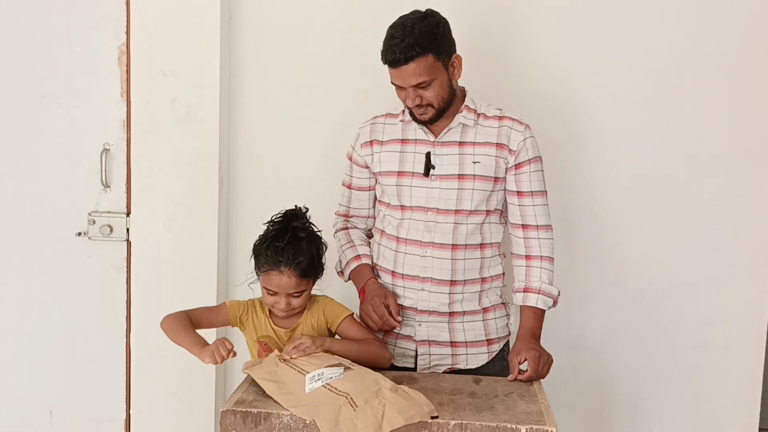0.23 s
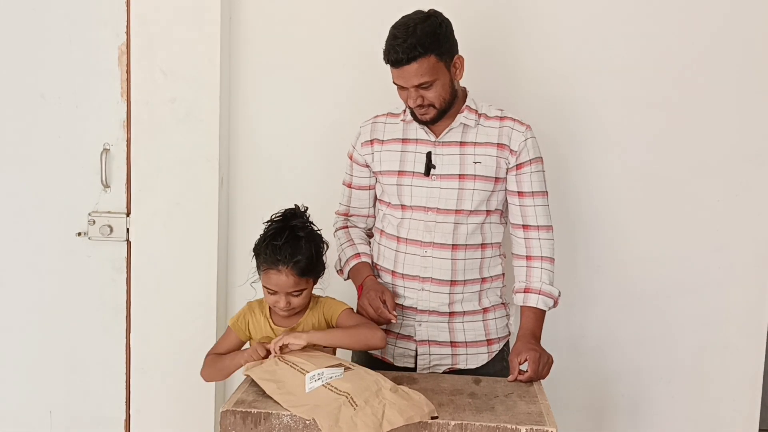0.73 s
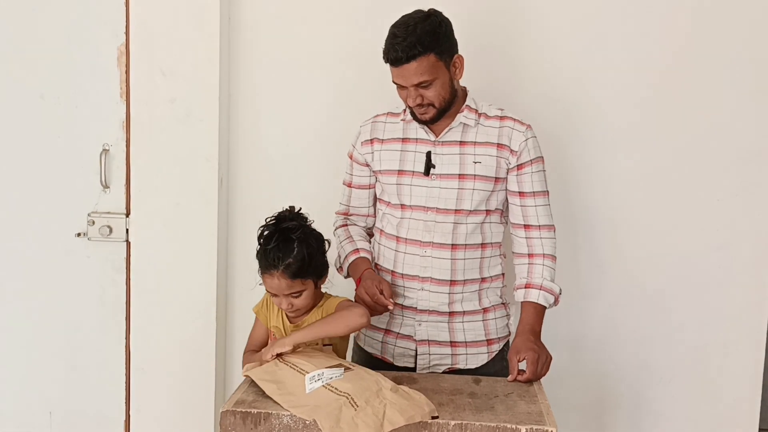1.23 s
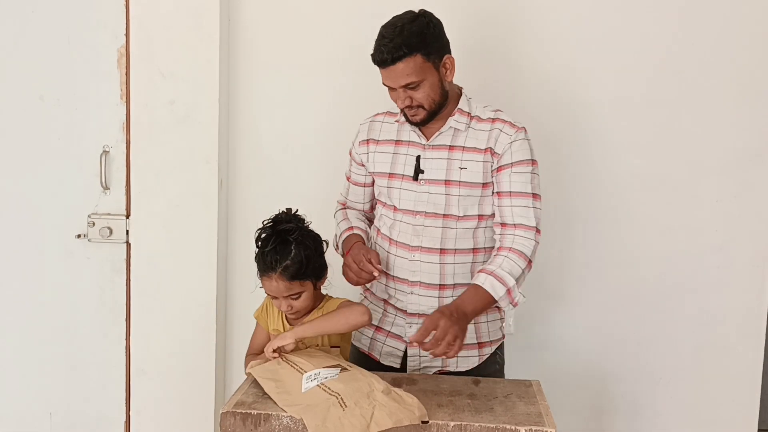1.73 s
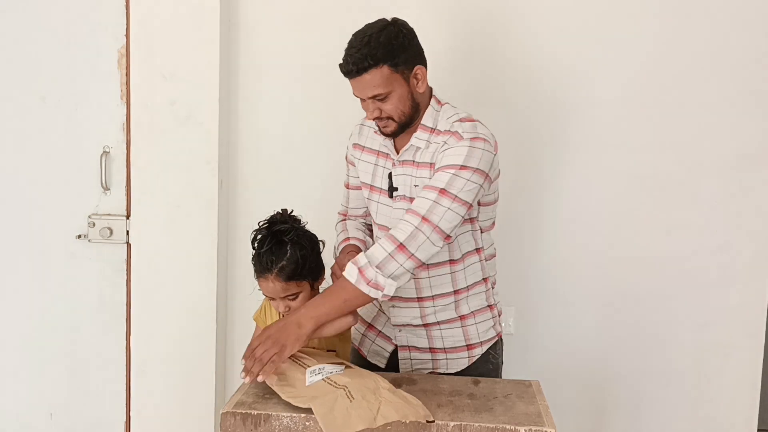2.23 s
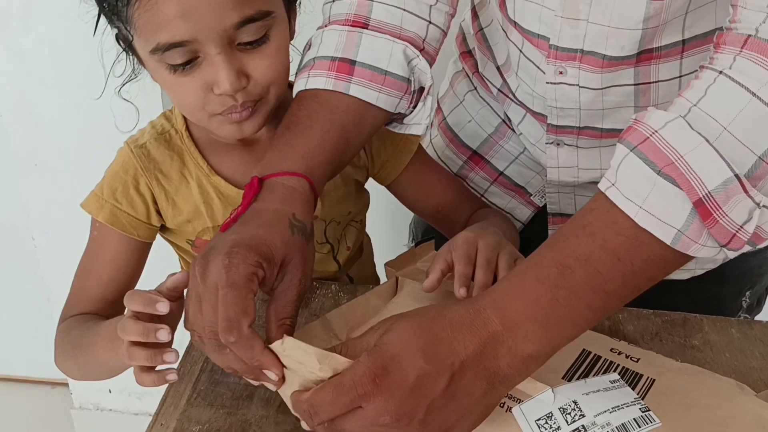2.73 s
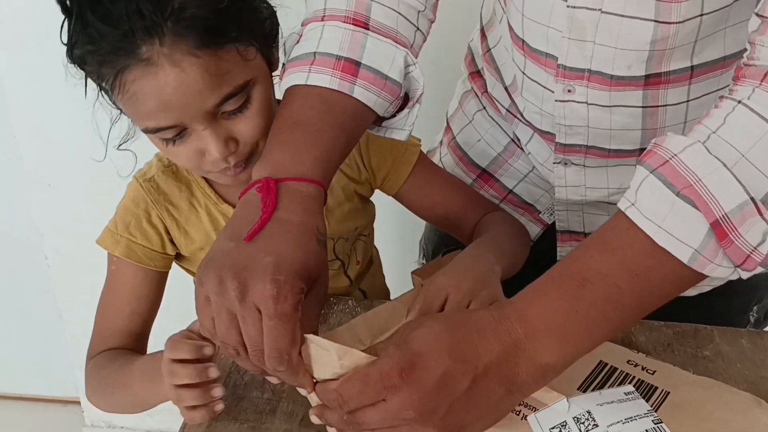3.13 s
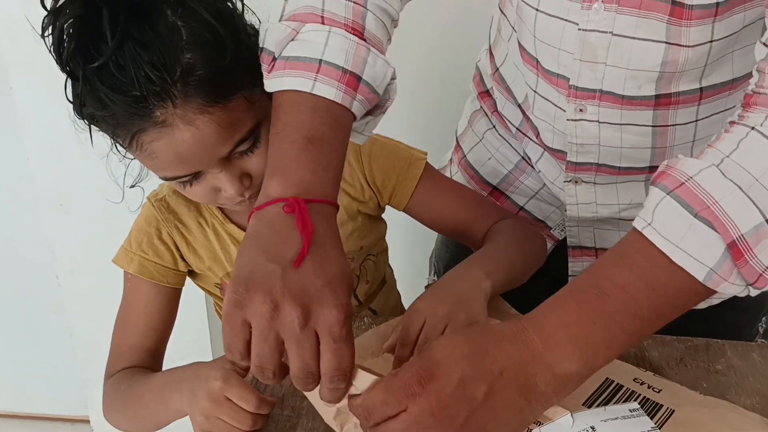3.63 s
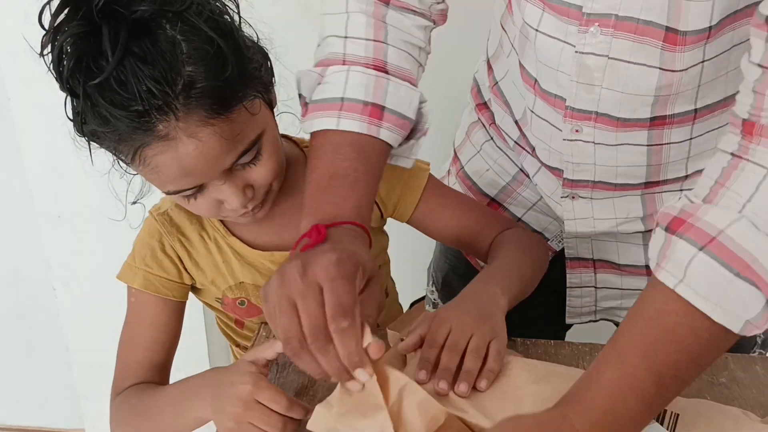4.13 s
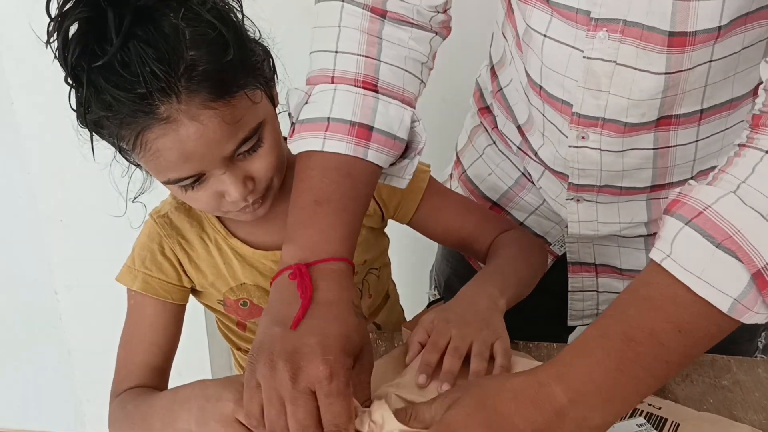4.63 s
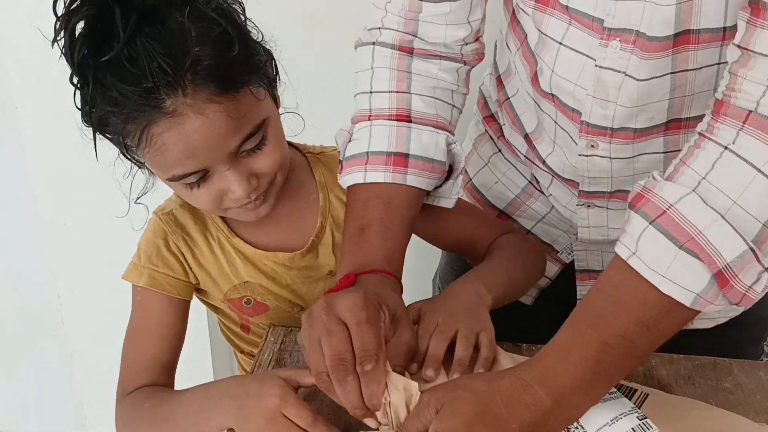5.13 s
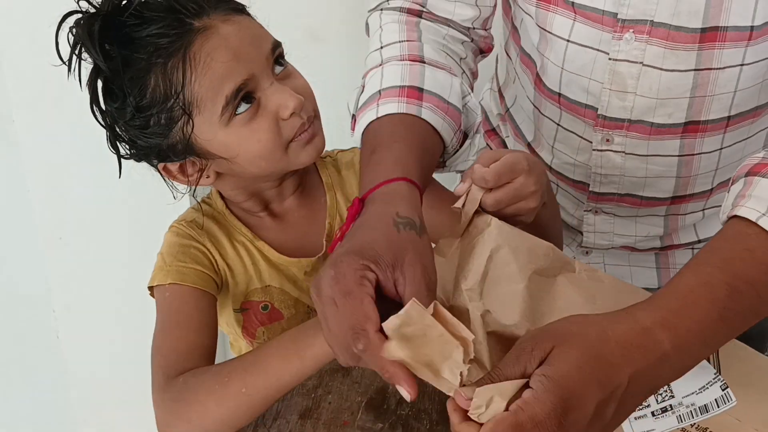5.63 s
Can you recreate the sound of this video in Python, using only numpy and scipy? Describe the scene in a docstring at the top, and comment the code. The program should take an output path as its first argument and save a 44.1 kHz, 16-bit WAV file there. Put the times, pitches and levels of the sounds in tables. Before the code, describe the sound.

Hands work a stiff paper mailer on a wooden table in a bare, slightly echoing room. Scattered crackles and small rips come first, with quiet gaps and a soft cloth brush near two seconds. After a very brief cut the crinkling is closer and denser, loudest between four and five seconds, then suddenly faint, with a few crisp creases at the end. A chest-worn microphone adds low rumble.

```python
"""A bare, hard-walled room with a wooden table, where hands crumple and tear a stiff paper envelope.
Creases snap as decaying panel tones with noisy cracks; crackle and rips are random slips through resonances.
The table top rings as damped modes, and sparse decaying reflections make the room.
A chest microphone adds body rumble, a brush of cloth and faint air, all of them coloured noise.
The sound falls silent twice for about 10 ms, cutting off the tails."""
import sys
import numpy as np
from scipy import signal
from scipy.io import wavfile
from scipy.ndimage import uniform_filter1d, minimum_filter1d

SR = 44100
rng = np.random.default_rng(int(sys.argv[2]) if len(sys.argv) > 2 else 0)


def natural_amplitude(level_db):
    """Convert a level in decibels to a linear amplitude factor, elementwise."""
    exponent = np.asarray(level_db, float) / 20
    return 10 ** exponent


def store_pcm(level_fs):
    """Save levels as 16-bit WAV."""
    pcm = np.round(np.clip(level_fs, -1, 1) * 32767).astype(np.int16)
    wavfile.write(sys.argv[1], SR, np.atleast_2d(pcm).T)


N = 259749

# All levels are relative, before the later mixing and filter gains.
# Passages of sound between the silences: (start [s], end [s])
PASSAGES = [(0, 2.587), (2.599, 5.24), (5.25, 5.89)]

# Air noise spectrum: (frequency [Hz], level [dB])
AIR_SPECTRUM = [(35, -18.5), (60, 6.5), (138, 19), (204, 6), (780, 4.5), (960, -26), (1050, 0.5),
                (9230, -12.5), (15000, -27)]
AIR_DB = -61

# Body rumble spectrum: (frequency [Hz], level [dB])
RUMBLE_SPECTRUM = [(12, -35), (25, -9), (42, -5), (53, 0), (65, -6), (85, -15), (120, -24), (200, -34),
                   (400, -90)]
# Body and cloth move the microphone: (start [s], length [s], level [dB])
SWAYS = [(0.004, 0.1, -53), (0.113, 0.033, -51), (0.196, 0.25, -48), (0.539, 0.063, -56),
         (1.478, 0.042, -52), (1.538, 0.27, -44), (1.831, 0.1, -45), (2.023, 0.25, -27),
         (2.365, 0.034, -60), (2.516, 0.11, -50), (2.603, 0.1, -44), (2.806, 0.11, -61), (2.959, 0.08, -57),
         (3.052, 0.034, -57), (3.129, 0.21, -49), (3.358, 0.093, -51), (3.52, 0.046, -53),
         (3.724, 0.05, -55.5), (3.785, 0.072, -52), (3.939, 0.061, -54), (4.069, 0.045, -55),
         (4.17, 0.46, -47), (4.635, 0.14, -51), (4.845, 0.075, -63), (4.945, 0.29, -47), (5.792, 0.14, -38)]
RESTING_DB, SWAY_EDGE_S = -63, .045

# How the hands work the paper, one list a passage:
# (time [s], force level [dB], panel frequency [Hz], tearing against crumpling [dB])
HAND_FORCE = [
    [(0.0, -33.5, 1037, 6), (0.22, -45, 1543, 4), (0.23, -12, 1604, 1), (0.31, -18, 838, 4),
     (0.54, -57, 898, 2.5), (0.72, -39.5, 1740, 4.5), (0.83, -74, 1150, -4), (0.96, -77, 833, -11),
     (1.05, -60, 2010, 13), (1.12, -39, 966, 3), (1.24, -43, 1955, -4), (1.33, -53.5, 1460, -3),
     (1.56, -17, 1686, 2.5), (1.77, -36, 1776, -0.5), (1.91, -72, 1180, 0.5), (2.05, -28.5, 1820, -13.5),
     (2.28, -36.5, 918, -2), (2.3, -14, 1050, -5.5), (2.47, -32, 960, -10.5), (2.56, -46, 1610, -3),
     (2.57, -31.5, 1637, 2), (2.59, -33, 1560, -21)],
    [(2.6, -56, 1860, 17.5), (2.69, -35.5, 615, 7.5), (2.77, -31, 617, 0), (2.82, -47, 1650, 19),
     (2.88, -39.5, 1510, 5), (2.97, -44, 1422, -2), (2.98, -15.5, 1610, 2), (3.03, -30.5, 1350, 1),
     (3.08, -18, 1110, 2), (3.15, -15.5, 1740, -4.5), (3.38, -66.5, 1260, 4.5), (3.41, -33, 1580, 9),
     (3.47, -38.5, 1690, -4.5), (3.53, -29.5, 1100, 2), (3.62, -20.5, 1350, -2), (3.82, -46, 1670, -5),
     (3.9, -28, 1390, 0.5), (3.98, -23, 1490, -12), (4.0, -4, 1610, -7.5), (4.09, -20.5, 1170, -2.5),
     (4.19, -3.5, 1560, -7.5), (4.26, -14.5, 1295, -0.5), (4.42, -15, 1536, -2), (4.58, -33, 1735, 0.5),
     (4.78, -10.5, 1432, -1), (4.83, -18, 1570, -3), (5.11, -12, 1245, -4), (5.24, -20.5, 1375, -8.5)],
    [(5.25, -50.5, 1057, 4), (5.368, -42, 1823, -4.5), (5.464, -54, 1890, 0), (5.512, -60, 820, 2),
     (5.536, -49, 1010, -4), (5.688, -45, 1680, -4), (5.756, -35, 840, -11), (5.774, -37, 834, -1),
     (5.838, -24, 945, -23), (5.89, -22.5, 1100, -4.5)],
]
# Small creases, one value a passage: (frequency [Hz])
CREASE_HZ = [3550, 4300, 3900]
# Fibre hiss spectrum: (frequency [Hz], level [dB])
HISS_SPECTRUM = [(3000, -47), (5500, -5.5), (7000, 5), (8300, -7), (9500, -4), (12000, -22), (15500, -39)]
HISS_PER_DB = 1.6  # fibre hiss grows faster with tearing than creases do

# Table-top modes: (frequency [Hz], level [dB], t60 before the hands damp it [s])
TABLE_MODES = [(103.9, -0.5, 1.9), (153, -4, 5.0), (299.7, 14.5, 0.81), (400, -19.5, 0.97),
               (594.4, 6.5, 1.4), (660, 2, 0.49)]
# The hand lands on the table and settles: (time [s], level [dB])
KNOCKS = [(2.686, -25.5), (2.694, -27), (2.721, -27.5), (2.749, -39.5), (4.888, -35.5)]
THROUGH_DB = -68.5  # paper pressing on the table shakes it a little

# Rips and drags:
# (start [s], length [s], starting level [dB], brightness [dB per octave], humming patch [Hz])
RIPS = [(0.001, 0.17, -40, -3, 916), (0.218, 0.069, -14, 2, 793), (0.557, 0.11, -58, 2, 2640),
        (0.679, 0.042, -39.5, -5, 1970), (1.094, 0.081, -39.5, 4.5, 1880), (1.095, 0.066, -39.5, 3.5, 684),
        (1.19, 0.14, -48, 0.5, 1900), (1.204, 0.14, -48.5, 4, 3200), (1.443, 0.059, -28, 1, 1410),
        (1.539, 0.051, -21, -0.3, 1920), (1.638, 0.027, -25, 9.5, 6750), (2.2935, 0.0072, -3.5, -2.5, 1360),
        (2.294, 0.13, -33.5, -1.5, 1170), (2.61, 0.14, -37.5, 3.5, 1770), (2.75, 0.14, -40.5, -6, 1600),
        (2.779, 0.095, -37, 1.5, 5230), (3.397, 0.14, -35, 5.5, 4070), (3.559, 0.051, -25, 0, 4050),
        (3.881, 0.12, -17.5, 1.5, 4570), (4.135, 0.039, -13, 4, 4180), (4.177, 0.045, -7, 1.5, 4230),
        (4.416, 0.0049, -13, 4, 4780), (5.245, 0.14, -53.5, -2, 9400), (5.338, 0.1, -59, -3, 1930),
        (5.531, 0.058, -44.5, 0.5, 836), (5.543, 0.049, -44, 6, 1490), (5.709, 0.15, -46, -5, 1710),
        (5.771, 0.018, -33, -6, 800), (5.777, 0.1, -37, -4, 4850), (5.814, 0.2, -30.5, -8.5, 2300)]
# Rip spectrum before the brightness tilt: (frequency [Hz], level [dB])
RIP_SPECTRUM = [(150, -56), (250, -8), (550, 0.5), (1270, -2), (1540, 5), (3050, -10.5), (3320, -11),
                (6590, -14), (11200, -29.5), (14000, -70), (15000, -90)]
HUM_DB, HUM_PER_DB = -20.5, -0.74  # hum against hiss at a 0 dB pull, change per dB: gentle drags hum

# Decay of the room's reflections: (frequency [Hz], t60 [s])
ROOM_DECAY = [(150, 0.73), (330, 0.51), (870, 0.32), (2300, 0.33), (6000, 0.17), (12000, 0.16)]
ROOM_DB = -9.5

# Snapping creases, timed when first heard:
# (time [s], panel peak level [dB], panel [Hz], crack rms level [dB], crack [Hz])
SNAPS = [(0.057, -20, 2200, -27.5, 3770), (0.138, -20, 1840, -29.5, 2670), (0.15, -33, 1650, -27.5, 3720),
         (0.227, -10, 1820, -18.5, 3600), (0.311, -6.5, 820, -43.5, 3690),
         (0.374, -14.5, 1050, -32.5, 3720), (0.424, -24, 734, -27.5, 3450), (0.559, -40, 1510, -53, 6700),
         (0.682, -29, 1490, -40, 2740), (0.708, -37, 1384, -51, 3800), (1.022, -53, 2490, -46, 5140),
         (1.034, -56, 2300, -49, 3630), (1.072, -39, 2290, -47, 3870), (1.098, -46, 659, -37.5, 3360),
         (1.135, -42, 664, -38, 3670), (1.226, -23.5, 2430, -41, 3400), (1.304, -44, 2190, -46, 2680),
         (1.373, -48, 719, -55, 3150), (1.393, -35, 2400, -45.5, 2730), (1.42, -28.5, 1530, -42.5, 3400),
         (1.468, -21, 1370, -27, 2680), (1.518, -19, 2070, -31.5, 2820), (1.548, -13, 1320, -22, 3160),
         (1.566, -16.5, 1980, -25.5, 3320), (1.646, -15.5, 1460, -23, 6870), (1.719, -24, 2170, -32, 3570),
         (2.202, -29, 1750, -41, 3360), (2.294, -9, 600, -17.5, 4450), (2.325, -13, 820, -32.5, 4530),
         (2.342, -9.5, 1200, -24.5, 4100), (2.388, -14.5, 1120, -36, 4300), (2.551, -34, 1700, -53, 3230),
         (2.566, -2.5, 1630, -35, 4760), (2.583, -6.5, 1610, -23, 4360), (2.644, -19, 1830, -29, 4670),
         (2.69, -11, 520, -41.5, 4230), (2.77, -25, 590, -31, 4720), (2.835, -13.5, 1610, -30, 4670),
         (2.863, -26, 1490, -31, 4380), (2.875, -15, 1470, -21, 4860), (2.883, -1, 1530, -20, 4880),
         (2.922, -8, 1570, -27.5, 4710), (2.941, -12.5, 1110, -31.5, 4780),
         (2.959, -14.5, 1560, -29.5, 4800), (2.984, -5.5, 1628, -19, 4700),
         (2.991, -6.5, 1400, -20.5, 4660), (3.004, -14, 1820, -25, 4020), (3.018, -19, 630, -26.5, 4350),
         (3.04, -23, 645, -26, 4150), (3.057, -19, 1140, -18, 4540), (3.066, -13, 1160, -28.5, 4640),
         (3.081, 0.5, 1175, -31, 4360), (3.098, -3, 1510, -18, 5070), (3.113, -15, 1350, -19, 5570),
         (3.126, -13, 1530, -20.5, 3420), (3.137, -10.5, 1760, -22, 3370), (3.143, -1, 1580, -19, 3900),
         (3.159, -1, 2020, -19.5, 4500), (3.22, -22, 1180, -28.5, 4600), (3.288, -30, 1570, -42, 3670),
         (3.408, -52, 1790, -32.5, 4100), (3.514, -24, 580, -28, 4120), (3.562, -21.5, 590, -29.5, 4300),
         (3.579, -13, 1480, -21.5, 4200), (3.601, -14.5, 1330, -23, 4330), (3.616, -7, 1180, -31, 4950),
         (3.639, -11, 1120, -12.5, 3820), (3.701, -26, 1100, -18.5, 4200), (3.788, -29, 1450, -37, 4040),
         (3.807, -24, 2400, -32, 4240), (3.841, -16, 2410, -24.5, 4430), (3.887, -17.5, 1530, -20, 6360),
         (3.901, -18.5, 1230, -15, 4860), (3.906, -4.5, 1250, -13, 4050), (3.935, -5, 1605, -24.5, 4050),
         (3.951, -16, 1530, -24.5, 3640), (3.964, -5, 1580, -24, 4660), (3.985, -9, 1180, -27.5, 4300),
         (3.997, 0, 2260, -20, 4360), (4.008, 7, 1600, -14, 6310), (4.023, -3.5, 1430, -20, 4610),
         (4.075, -4, 1220, -26.5, 4680), (4.086, -31, 1300, -19, 4530), (4.11, -3, 1270, -17, 4720),
         (4.136, 3.5, 1460, -14.5, 6140), (4.142, 2, 1350, -8, 4180), (4.157, 4, 1370, -10.5, 4300),
         (4.186, -1, 1400, -4, 4030), (4.211, 1, 1600, -12.5, 5830), (4.219, -14, 1380, -18.5, 6020),
         (4.227, -16, 1380, -24.5, 4660), (4.244, -17, 1690, -28, 3970), (4.273, -13, 1800, -23.5, 3380),
         (4.29, -18.5, 1670, -22.5, 3140), (4.31, -4, 1704, -23, 3460), (4.343, -5, 1570, -31.5, 3580),
         (4.397, -3, 1730, -13, 4050), (4.405, -4, 1240, -12.5, 4930), (4.435, -11, 2000, -26, 3790),
         (4.514, -13, 1910, -22.5, 2840), (4.532, -13, 1870, -22.5, 3540),
         (4.546, -14.5, 1840, -23.5, 4560), (4.56, -20, 1770, -31, 3820), (4.647, -15, 1550, -28, 4800),
         (4.655, -6.5, 1640, -25, 4510), (4.68, -6, 1680, -24, 4120), (4.691, -17, 650, -19, 5360),
         (4.734, -5.5, 1420, -19, 6570), (4.756, -3.5, 1710, -20.5, 4270), (4.766, -0.5, 1020, -22.5, 3070),
         (4.775, -11, 1670, -33, 3890), (4.798, -6, 1720, -18, 4130), (4.803, 1, 1630, -33, 3770),
         (4.814, -5, 1800, -23.5, 4030), (4.836, -24, 1530, -23, 4000), (4.863, -16, 1780, -18, 3500),
         (4.89, 6, 1730, -15.5, 3560), (4.92, -7, 1380, -18.5, 3940), (4.942, -5.5, 2450, -18, 3420),
         (4.963, -8.5, 1580, -16, 3580), (4.983, -5, 1380, -18, 3400), (4.997, -2, 1480, -16.5, 3440),
         (5.004, 2, 1750, -16, 4030), (5.014, -4, 590, -27.5, 3070), (5.033, -4, 1760, -26, 3960),
         (5.041, -1, 970, -20, 4060), (5.057, -25, 1450, -28, 2880), (5.075, 0.5, 1400, -21, 4560),
         (5.084, 2, 1680, -18, 4170), (5.099, -8.5, 1380, -26, 3260), (5.107, -9, 590, -39.5, 4090),
         (5.12, -0.5, 1540, -21.5, 4220), (5.132, -13, 1890, -23.5, 3240), (5.156, -6, 1870, -23, 2720),
         (5.168, -12, 845, -30, 2820), (5.203, -5, 2076, -29.5, 2960), (5.218, -16.5, 796, -31, 4070),
         (5.233, -17, 1840, -36, 4050), (5.353, -29, 1950, -58, 2820), (5.37, -24.5, 1910, -51, 3170),
         (5.394, -39, 1970, -56, 2740), (5.441, -33, 1860, -59, 3130), (5.53, -33.5, 770, -47.5, 3190),
         (5.643, -42, 1650, -56, 4030), (5.676, -42, 931, -56, 4150), (5.713, -32, 1740, -50, 4290),
         (5.747, -24, 1720, -45.5, 2900), (5.766, -19.5, 830, -51, 3550), (5.777, -9, 744, -40.5, 4500),
         (5.79, -13, 850, -31.5, 4470), (5.82, -6, 2130, -39, 3980), (5.829, -2.5, 870, -36, 2900),
         (5.85, -14, 870, -34, 4660), (5.871, -10, 923, -29.5, 2710)]
# Spectrum of tearing fibres: (frequency [Hz], level [dB])
FIBRE_SPECTRUM = [(1290, -22.5), (2200, 1), (2810, -9), (4190, -23), (5400, -18.5), (6520, -2.5),
                  (8260, -13), (9040, -11.5), (9970, -20.5), (15500, -90.5)]
# Spectrum of the whole sheet jolting: (frequency [Hz], level [dB])
SHEET_SPECTRUM = [(150, -32), (300, -10.5), (600, -3.5), (1000, -0.5), (2000, 5), (3000, -19.5),
                  (5000, -43.5)]
GIVE_S = .0015  # a snap peaks this long after it is first heard
RING_S, RING_SPREAD = 0.017, 1.3  # t60 of a 1500 Hz panel, times or divided by up to the spread
DUST_DB, DUST_PER_DB = 6, 1.37  # loose fibres: drive for a 0 dB crack, change per dB of crack

# Shirt brushing past the microphone: (time [s], level [dB])
SLEEVE_LEVEL = [(1.97, -73), (2.026, -31), (2.086, -25.5), (2.142, -52), (2.16, -36.5), (2.24, -31.5),
                (2.278, -68), (2.29, -25)]
# Cloth spectrum: (frequency [Hz], level [dB])
CLOTH_SPECTRUM = [(240, -59), (400, -17.5), (528, -36), (619, -4), (959, -35.5), (1130, -5.5),
                  (1550, -28.5), (1850, 6.5), (2070, -16), (2430, 0), (2620, -23.5), (4550, -12.5),
                  (5500, -32), (9860, -25), (13000, -54)]

# Microphone response with its treble roll-off: (frequency [Hz], level [dB])
MIC_RESPONSE = [(20, 3.5), (9000, 2), (12000, 0.5), (15700, -18.5), (17000, -19)]


def evened(x):
    """Normalisation: scales a signal to unit rms."""
    return x / np.sqrt(np.mean(x ** 2) + 1e-20)


def add(mix, s, sound):
    """Superposition: adds a sound into the mix from time s."""
    part = mix[round(s * SR):][:len(sound)]
    part += sound[:len(part)]


def read(points, hz):
    """Logarithmic pitch scale: interpolates values along log frequency."""
    f, value = np.transpose(points)
    return np.interp(np.log(hz + 1), np.log(f + 1), value)


def curve(rows):
    """Linear interpolation: turns timed rows into one control curve per column."""
    s, *columns = np.transpose(rows)
    return [np.interp(np.arange(N) / SR, s, c) for c in columns]


def colour(x, points):
    """Minimum-phase filtering: shapes the spectrum causally, so clicks keep their sharp fronts."""
    db = np.maximum(read(points, abs(np.fft.fftfreq(8192, 1 / SR))), -100)
    log_gain = np.log(natural_amplitude(db))
    taps = np.fft.ifft(np.exp(np.conj(signal.hilbert(log_gain)))).real[:4096]
    return signal.oaconvolve(x, taps / np.linalg.norm(taps))[:len(x)]


def resonate(x, hz, width):
    """Resonance by heterodyning: shifts a band, which may move, down to zero, smooths it and shifts it back."""
    turn = np.exp(2j * np.pi * np.cumsum(hz * np.ones(len(x))) / SR)
    r = np.exp(-np.pi * width / SR)
    return 2 * (turn * signal.lfilter([1 - r], [1, -r], x / turn)).real


def clicks(per_s, spread_db):
    """Stick-slip statistics: slips of either sign, most small and a few large, coming in clumps."""
    clump = natural_amplitude(4.2 * evened(uniform_filter1d(rng.standard_normal(N), 400)))
    size = natural_amplitude(spread_db * np.minimum(rng.exponential(1, N), 4))
    size *= rng.choice([-1., 1.], N)
    return evened(size * clump * (rng.random(N) < per_s / SR))


def grains(hz, sizes, per_s, spread_db):
    """Modal excitation: patches of several sizes (ratio, dB, width Hz) each ring to their own slips."""
    out = 0
    for ratio, db, width in sizes:
        slips = clicks(per_s, spread_db)
        ringing = resonate(resonate(slips, hz * ratio, width), hz * ratio, 2 * width)
        out = out + natural_amplitude(db) * evened(ringing)
    return evened(out)


def air():
    """Stationary noise: a steady, faint, coloured background."""
    return natural_amplitude(AIR_DB) * evened(colour(rng.standard_normal(N), AIR_SPECTRUM))


def rumble():
    """Amplitude modulation: low noise, faint at rest, swells while the wearer shifts."""
    t, level = np.arange(N) / SR, natural_amplitude(RESTING_DB)
    for s, length, db in SWAYS:
        from_edge = np.minimum(t - s, s + length - t)
        level = level + natural_amplitude(db) * np.clip(from_edge / SWAY_EDGE_S + .5, 0, 1) ** 2
    return level * evened(colour(rng.standard_normal(N), RUMBLE_SPECTRUM))


def crackle():
    """Granular slip noise: panels of the size being handled ring, small creases crinkle, fibres hiss."""
    force_db, panel_hz, tear_db = curve([row for passage in HAND_FORCE for row in passage])
    ends = [end for _, end in PASSAGES[:-1]]
    crease_hz = np.array(CREASE_HZ)[np.searchsorted(ends, np.arange(N) / SR)]
    panels = grains(panel_hz, [(.45, 0, 254), (.7, -9.5, 307), (1.0, 2, 309), (1.35, -0.5, 450)], 900, 1.5)
    pops = grains(panel_hz, [(.6, 0.015, 297), (1.2, 0.018, 442)], 70, 1.8)
    creases = grains(crease_hz, [(.78, 3.5, 600), (1.0, 5.5, 700), (1.25, 1.5, 910)], 2000, 0.87)
    fibres = evened(colour(clicks(11000, 2.3), HISS_SPECTRUM))
    crumpling = natural_amplitude(-10) * panels + natural_amplitude(-10) * pops
    tearing = natural_amplitude(tear_db - 9) * creases + natural_amplitude(HISS_PER_DB * tear_db - 17) * fibres
    return natural_amplitude(force_db) * (crumpling + tearing)


def table(paper):
    """Modal synthesis: the table top's low modes ring, struck by the hand and shaken through the paper."""
    force, t = natural_amplitude(THROUGH_DB) * paper, np.arange(SR // 2) / SR
    for s, db in KNOCKS:
        add(force, s, natural_amplitude(db) * np.hanning(30) / 15)
    longest = .12  # t60 limit [s]: hands resting on the wood damp it
    ring = 0
    for hz, db, t60 in TABLE_MODES:
        ring = ring + natural_amplitude(db - 60 * t / min(t60, longest)) * np.sin(2 * np.pi * hz * t)
    return signal.fftconvolve(force, ring)[:N]


def rips():
    """Dense stick-slip: a run of slips starts abruptly, makes one patch hum and stops as the pull slackens."""
    out, slips = np.zeros(N), clicks(9000, 4.27)
    for s, length, db, tilt_db, hz in RIPS:
        run = slips[round(s * SR):][:round(length * SR)]
        u = np.arange(len(run)) / (length * SR)  # progress, 0 to 1
        spectrum = [(f, v + tilt_db * np.log2(f / 1500)) for f, v in RIP_SPECTRUM]
        hiss = evened(colour(run, spectrum))
        hum = resonate(resonate(run, hz, 60 + 0.16 * hz), hz, 120 + 0.14 * hz)
        run = evened(hiss + natural_amplitude(HUM_DB + HUM_PER_DB * db) * evened(hum))
        fades = np.clip(u * length / 0.003, 0, 1) * np.clip((1 - u) / 0.13, 0, 1)
        add(out, s, natural_amplitude(db - 3.0 * u) * run * fades)
    return out


def room(x):
    """Reverberation: sparse reflections decay by band; three tails cross-fade in a steady cycle."""
    out, at = np.zeros(N), np.arange(260, SR - 22, 22)
    for k in range(3):
        taps = np.zeros(SR)
        taps[at + rng.integers(0, 22, len(at))] = rng.choice([-1., 1.], len(at))
        hz, t, bands = signal.stft(taps, SR, nperseg=256)
        decay = natural_amplitude(-60 * t / read(ROOM_DECAY, hz)[:, None])
        tail = signal.istft(bands * decay, SR, nperseg=256)[1]
        # the reflections keep shifting
        share = np.cos(np.pi * (np.arange(N) / SR * 7 + k / 3)) * np.sqrt(2 / 3)
        out += signal.fftconvolve(x * share, tail / np.linalg.norm(tail))[:N]
    return out


def snaps():
    """Sudden release: a crease gives, its panel swells and rings a few cycles, fibres crack in the treble."""
    out, dust, jolt, t = np.zeros(N), np.zeros(N), np.zeros(N), np.arange(2048) / SR
    noise, chance = rng.standard_normal((len(SNAPS), len(t))), rng.random((len(SNAPS), 3))
    lead = .004  # the crease creaks this long [s] before it gives
    creak = 0.28 * t / lead + 1.9 * np.clip(1 + (t - lead) / 0.0014, 0, 1) ** 2
    swell = np.where(t < lead, creak, natural_amplitude(-60 * (t - lead) / 0.022))
    for (s, db, hz, crack_db, crack_hz), grit, (a, b, c) in zip(SNAPS, noise, chance):
        s, rise = s + GIVE_S, 1.417 / hz
        t60 = RING_S * np.sqrt(1500 / hz) * RING_SPREAD ** (2 * c - 1)  # larger panels ring longer
        decay = natural_amplitude(-60 * (t - rise) / np.clip(t60, .003, .08))
        ring = np.sin(2 * np.pi * hz * t)
        ring += 0.084 * np.sin(2 * np.pi * (hz * (.5 + 0.46 * a) * t + b))  # a faint lower partial
        ring *= np.where(t < rise, np.sin(np.pi / 2 * t / rise) ** 2, decay)
        crack = resonate(resonate(grit * swell, crack_hz, 1100), crack_hz, 2300)
        add(out, s - rise, natural_amplitude(db) * ring / abs(ring).max())
        add(out, s - lead, natural_amplitude(crack_db) * crack / np.std(crack[:round(.012 * SR)]))
        add(dust, s - lead, natural_amplitude(DUST_DB + DUST_PER_DB * crack_db - 2.3 * a) * grit[::-1] * swell)
        add(jolt, s - lead, natural_amplitude(db) * grit * swell)
    return out + colour(dust, FIBRE_SPECTRUM) + natural_amplitude(-9.5) * colour(jolt, SHEET_SPECTRUM)


def sleeve():
    """Friction noise: smooth cloth hiss, heard only while the arm reaches across."""
    t = np.arange(N) / SR
    reaching = (t > SLEEVE_LEVEL[0][0]) & (t < SLEEVE_LEVEL[-1][0])
    moving = uniform_filter1d(1. * reaching, size=400)
    return moving * natural_amplitude(curve(SLEEVE_LEVEL)[0]) * evened(colour(rng.standard_normal(N), CLOTH_SPECTRUM))


def scene():
    """Superposition of direct and reflected sound: each passage rings alone, cut off at its end."""
    paper, t, out = snaps() + crackle() + rips(), np.arange(N) / SR, np.zeros(N)
    background = rumble() + air() + sleeve()
    for start, end in PASSAGES:
        gate = uniform_filter1d(1. * ((t >= start) & (t < end)), size=24)
        near = gate * paper + table(gate * paper) * (t >= start)
        out += gate * (near + natural_amplitude(ROOM_DB) * room(gate * near) + background)
    return out[None]


def roll_off(x):
    """The treble ends steeply here."""
    return signal.sosfilt(signal.butter(12, 15760, fs=SR, output="sos"), x)


def record(dry):
    """Peak limiting: the top octave is dulled, then a fast gain holds the loudest peaks under full scale."""
    x = colour(dry[0], MIC_RESPONSE) * natural_amplitude(-8.5)
    safe_gain = np.minimum(1, .98 / (abs(x) + 1e-9))
    gain = uniform_filter1d(minimum_filter1d(safe_gain, size=129), size=65)
    return roll_off((x * gain)[None])


dry = scene()
out = record(dry)
store_pcm(out)
```